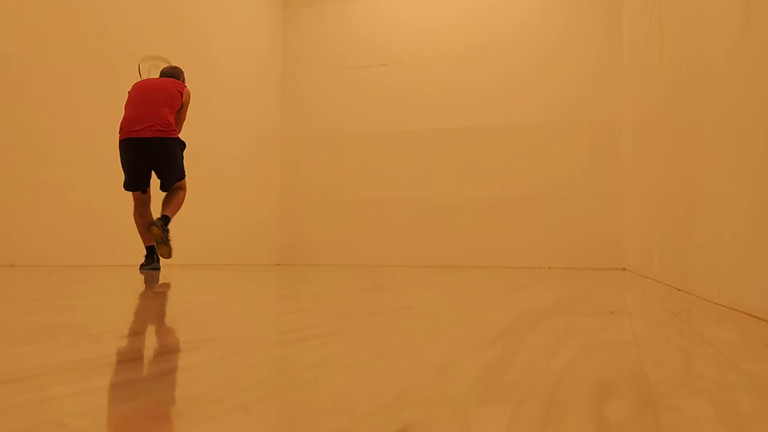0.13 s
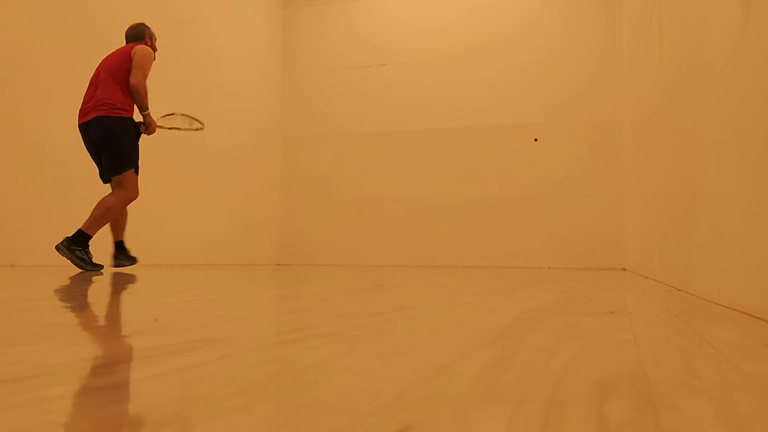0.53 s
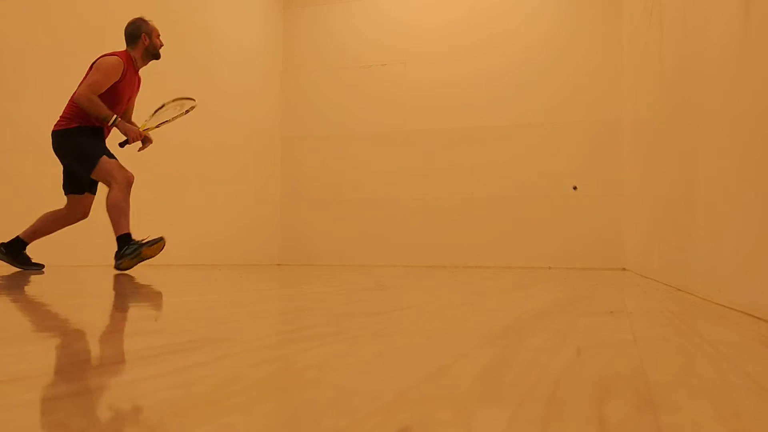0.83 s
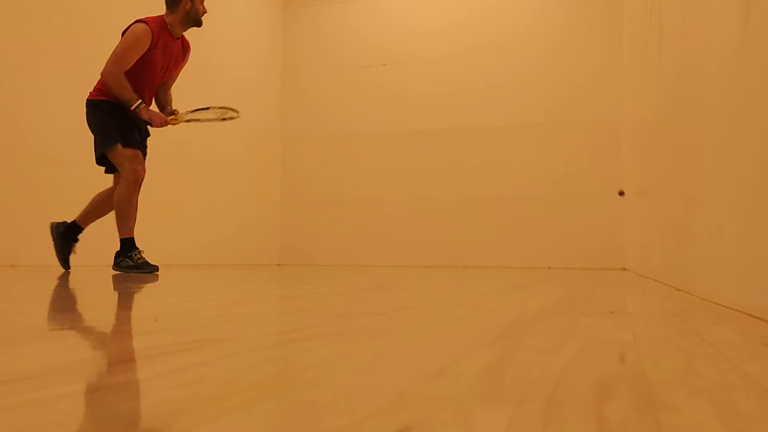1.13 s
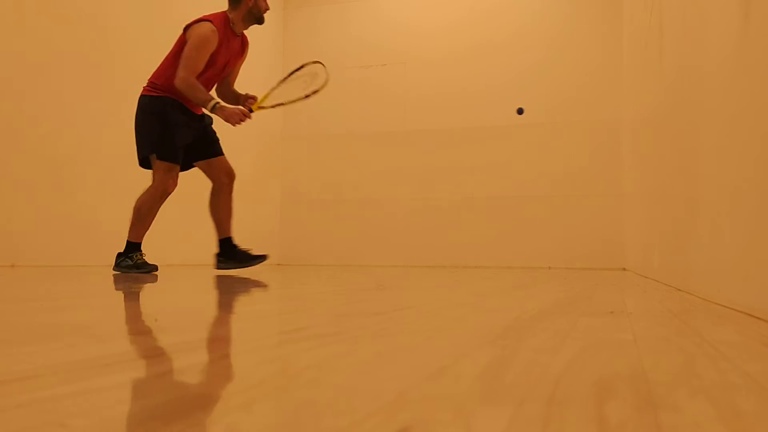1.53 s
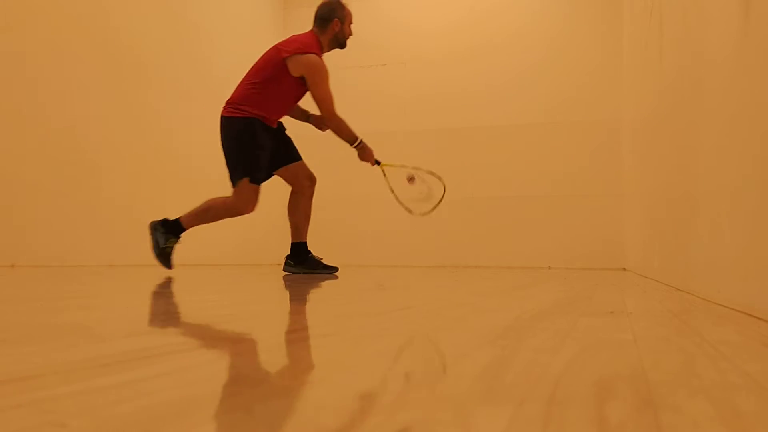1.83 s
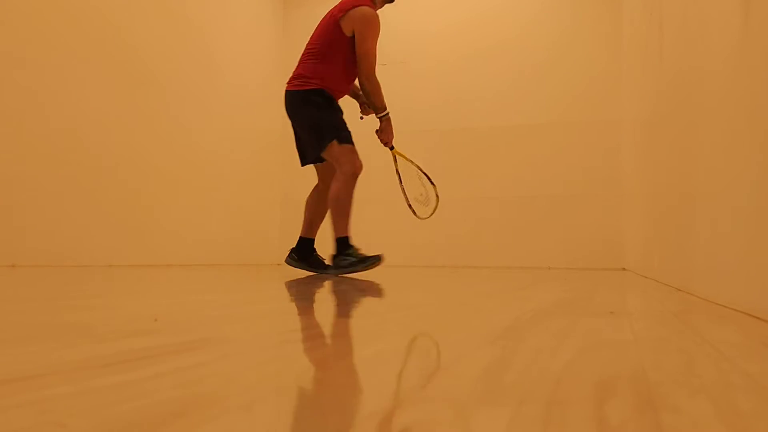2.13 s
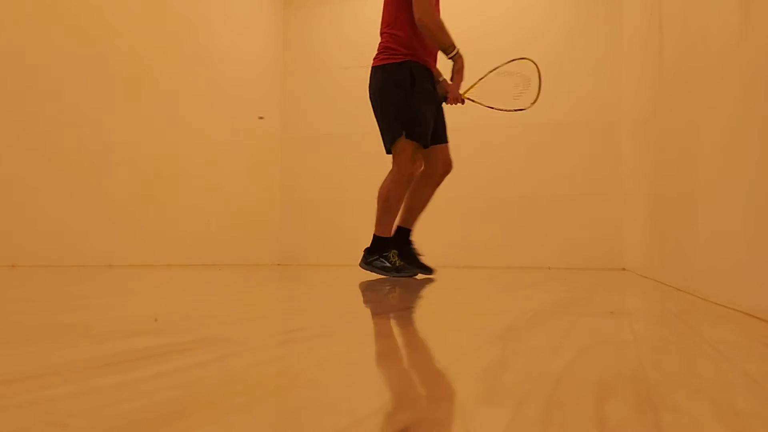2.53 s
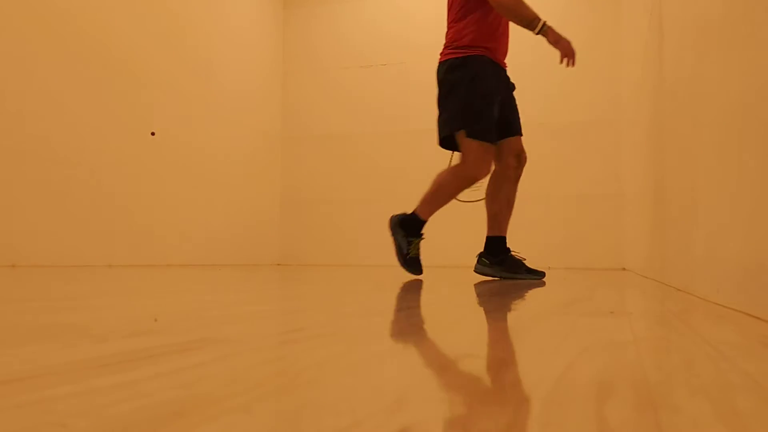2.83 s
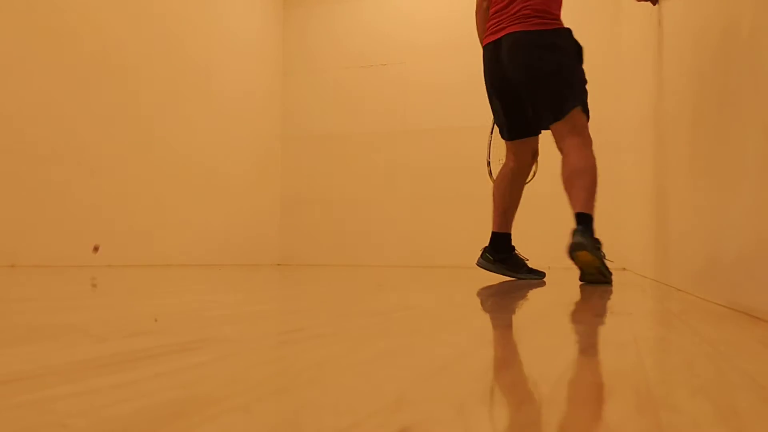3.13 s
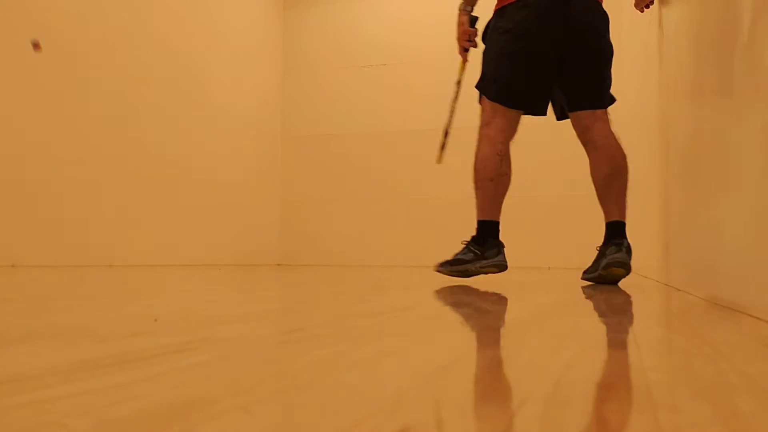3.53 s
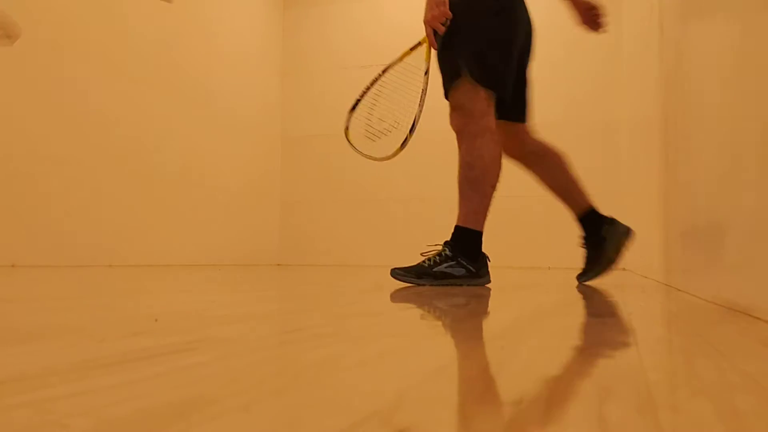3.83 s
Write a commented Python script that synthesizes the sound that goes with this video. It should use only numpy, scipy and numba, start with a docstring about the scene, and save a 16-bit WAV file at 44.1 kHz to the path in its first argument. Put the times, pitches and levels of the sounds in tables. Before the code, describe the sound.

A racquet smacks a rubber ball that cracks off walls and floor in an echoing court

```python
"""In a bare, hard court with steady air noise, the tail of an earlier blow dies away as a little metal jingles.
A racquet then strikes a rubber ball, which bounces off walls and floor while shoes step.
Each arrival or strong wall echo is a noise crack, a ring of decaying modes and a low sine thud; panels hum on.
Shaped noise makes the long tail; two spaced microphones feed a limiter and a soft clipper."""
import sys
import numpy as np
from scipy import signal
from scipy.fft import rfft, irfft, next_fast_len
from scipy.io import wavfile
from scipy.ndimage import uniform_filter1d
from numba import njit

SR = 44100
rng = np.random.default_rng(int(sys.argv[2]) if len(sys.argv) > 2 else 0)


def int16_out(signal):
    """Quantize to a 16-bit WAV file."""
    q = np.round(np.clip(np.atleast_2d(signal).T, -1, 1) * 32767)
    wavfile.write(sys.argv[1], SR, q.astype(np.int16))


def gain_from_db(level_db):
    """Convert decibel levels to linear amplitude factors (20 dB per decade)."""
    decades = np.asarray(level_db, float) / 20
    return 10 ** decades


N = 176400


def curve(table, hz):
    """Interpolate (frequency [Hz], value) points on a log-frequency axis."""
    table = np.array(table, float)
    return np.interp(np.log(hz + 1), np.log(table[:, 0] + 1), table[:, 1])


def colour(x, table):
    """Filter by (frequency [Hz], gain [dB]) points."""
    hz = np.fft.rfftfreq(x.shape[-1], 1 / SR)
    return irfft(rfft(x) * gain_from_db(curve(table, hz)), x.shape[-1])


def decay(t, t60):
    """Exponential decay by 60 dB in t60 seconds."""
    return np.exp(-np.log(1000) * t / t60)


# air spectrum before levelling: (frequency [Hz], relative density [dB per Hz])
AIR_SPECTRUM = [(15, -36), (25, -23), (219, 0), (312, -9.5), (387, -1.5), (582, -3.5), (743, -8.5),
                (1310, -26), (5240, -27.5), (16400, -65)]
AIR_MID_RMS_DB, AIR_SIDE_HIGHPASS_HZ = -39, 900


def air():
    """Steady ventilation rumble and hiss; a high-passed side signal keeps the bass alike left and right."""
    mid, side = colour(rng.standard_normal((2, N)), AIR_SPECTRUM)
    side = signal.lfilter(*signal.butter(1, AIR_SIDE_HIGHPASS_HZ, "high", fs=SR), side)
    return gain_from_db(AIR_MID_RMS_DB) * np.array([mid + side, mid - side]) / mid.std()


# band centres of the blow levels: (frequency [Hz])
BLOW_BANDS_HZ = [45, 110, 270, 580, 950, 2000, 3600, 5800, 11000]
# blows of ball and shoes as they fill the room:
# (time [s], then relative level [dB] in each of BLOW_BANDS_HZ)
ROOM_BLOWS = [(-.35, 5.5, 3, -2.5, -2, -11.5, -11, -6.5, 2, 17),
              (.02, -28, -20, -31, -21, -17, -22.5, -17, -16, -23),
              (0.491, 0, -3.5, -14, -37, -26, -23, -28, -20, -12),
              (.672, 10, 4, -12, 3, 7, 3.5, 5, 5.5, 6.5),
              (.736, -4, -2.5, 2.5, -7.5, 1.5, 1, -3.5, 3.5, -1),
              (1.136, -4, 4, -6.5, -7, -12, -2, -0.5, -5.5, 0.5),
              (1.578, 0, -20, -30, -9, -7.5, -28, -19, -13.5, -11),
              (1.89, -25, -16, -16, -15, -22, -15, -16, -10.5, -7),
              (1.968, -5, -5, -6.5, -14.5, -2.5, -8.5, -3.5, -1.5, -2.5),
              (2.28, -4, -4, -9, -20, -9, -20, -27, -25, -10), (2.5, 10, -2, 1, 4.5, 1.5, 7, -2, 4, 5),
              (2.589, 1, -7, 0, -7.5, -7.5, -1, 5, 4.5, 4),
              (2.85, -4, 0.5, -11.5, 2, -2.5, -3, -2.5, -21, -31),
              (3.296, -9, -12, -12.5, -10, -8, -5.5, -3.5, -7, -1.5),
              (3.81, -15, -28, -1, -3, -7.5, -15, -11, -5, -0.5)]
# hollow notes of ball, wall and floor sent into the room:
# (time [s], frequency [Hz], bandwidth [Hz], relative peak level [dB])
HOLLOW_NOTES = [(.67, 313, 69.6, 6.5), (.67, 410, 88, 2), (.7, 130, 60, 5.5), (.67, 863, 192, 5.5),
                (.74, 690, 80, 4.5), (2.66, 247.6, 50.6, 7), (1.2, 133, 60, -1.5), (2.5, 119, 30, 4),
                (2.52, 239, 45, 10), (2.59, 630, 78, 10), (2.59, 870, 60, 1), (2.85, 126, 40, 4.5),
                (3.296, 115.7, 50.6, 10), (3.81, 231, 80, -6)]
LEAD_S = 0.5  # makes room for the blow before time 0


def blow_spectrum(hz):
    """Blows are coloured impulses; hollow notes are single resonances; both are delayed by phase."""
    total = 0
    for s, *levels_db in ROOM_BLOWS:
        level = gain_from_db(curve(list(zip(BLOW_BANDS_HZ, levels_db)), hz))
        total = total + level * np.exp(-2j * np.pi * hz * (s + LEAD_S))
    for s, note_hz, width_hz, db in HOLLOW_NOTES:
        resonance = gain_from_db(db) / (1 + 2j * (hz - note_hz) / width_hz)
        total = total + resonance * np.exp(-2j * np.pi * hz * (s + LEAD_S))
    return total


# reverberation time: (frequency [Hz], t60 [s])
ROOM_T60 = [(40, 5.2), (120, 1.77), (300, 2.57), (900, 3.87), (2500, 3.23), (5500, 2.35), (9000, 0.7),
            (15000, 0.54)]
# filling of the room: (frequency [Hz], time constant [s])
ROOM_BUILD = [(60, 0.0093), (250, 0.029), (900, 0.012), (5000, 0.011)]
# early-echo clumping before smoothing and fade: (frequency [Hz], level spread [dB])
CLUMP_SPREAD = [(200, 3), (900, 6.5), (5000, 5)]
CLUMP_S, CLUMP_FADE_S = 0.005, 0.15
OWN_CLUMP_WEIGHT = 0.39  # part of the clumping that each octave has for itself


def room_tail():
    """Octave bands of noise build up and decay, with random level clumps that fade into a wash."""
    t = np.arange(N + SR // 2) / SR
    hold = int(CLUMP_S * SR)
    steps = np.repeat(rng.standard_normal((11, 4000)), hold, axis=1)[:, :len(t)]
    steps = uniform_filter1d(steps, hold // 2)
    shared, own = steps[0], steps[1:]
    clumps = (1 - OWN_CLUMP_WEIGHT ** 2) ** 0.5 * shared + OWN_CLUMP_WEIGHT * own
    clumps = clumps * np.exp(-t / CLUMP_FADE_S)
    hz = np.fft.rfftfreq(len(t), 1 / SR)
    noise = rfft(rng.standard_normal((2, len(t))))
    tail = 0
    for centre_hz, clump in zip(30 * 2.0 ** np.arange(10), clumps):
        band = np.clip(1 - np.abs(np.log2((hz + 1) / centre_hz)), 0, 1)
        build = 1 - np.exp(-t / curve(ROOM_BUILD, centre_hz))
        envelope = decay(t, curve(ROOM_T60, centre_hz)) * build
        clumping = gain_from_db(curve(CLUMP_SPREAD, centre_hz) * clump)
        tail = tail + irfft(noise * band, len(t)) * envelope * clumping
    return tail


# tail colour of the mid signal: (frequency [Hz], relative density [dB per Hz])
ROOM_MID = [(25, -6.5), (45, -10.5), (76, -2.5), (140, 0.5), (250, -1), (409, -2.5), (560, -6), (666, -3),
            (750, -4), (870, -1.5), (960, -3.5), (1080, -9), (1230, -15.5), (1970, -17.5), (3000, -19.5),
            (4100, -23.5), (4700, -19.5), (5200, -12), (5600, -18.5), (5950, -21), (6400, -16.5),
            (6950, -17.5), (7500, -28), (8200, -41), (10000, -45), (15500, -55)]
# tail colour of the side signal: (frequency [Hz], relative density [dB per Hz])
ROOM_SIDE = [(25, -54), (111, -47), (377, -12.5), (536, -13), (974, 6.5), (1180, -5), (1720, -17),
             (3000, -16), (4100, -21.5), (4600, -18), (5200, -9.5), (5950, -21.5), (6700, -12.5),
             (7300, -22), (8200, -37.5), (10000, -47), (15500, -49)]
MID_GAIN_DB, SIDE_GAIN_DB = -3.5, -6


def court():
    """Convolve every blow with the room tail, then colour its mid and side signals."""
    size = next_fast_len(2 * N + SR)
    hz = np.fft.rfftfreq(size, 1 / SR)
    mid_db = curve(ROOM_MID, hz) + MID_GAIN_DB
    side_db = curve(ROOM_SIDE, hz) + SIDE_GAIN_DB
    spectrum = rfft(room_tail(), size) * blow_spectrum(hz) * gain_from_db(np.array([mid_db, side_db]))
    start = int(LEAD_S * SR)
    mid, side = irfft(spectrum, size)[:, start:start + N]
    return np.array([mid + side, mid - side])


EAR_LAG_S = 0.0005  # largest delay between microphones


def place(out, sound, s, pan_db):
    """Add a sound at time s; the far microphone hears it weaker and later; positive pan is left."""
    out = out.copy()
    for ch, sign in enumerate((1, -1)):
        lag_s = EAR_LAG_S * np.clip(0.5 - sign * pan_db / 4, 0, 1)
        i = int((s + lag_s) * SR)
        part = sound[:N - i]
        out[ch, i:i + len(part)] += part * gain_from_db(sign * pan_db / 2)
    return out


def ring(modes, t, phases):
    """Sum of exponentially decaying sine modes."""
    total = 0
    for (hz, db, t60), phase in zip(modes, phases):
        total = total + gain_from_db(db) * np.sin(2 * np.pi * hz * t + phase) * decay(t, t60)
    return total


# metal modes: (frequency [Hz], relative level [dB], t60 [s])
METAL_MODES = [(8620, -24, 0.87), (9370, -24, 0.52), (11200, -27, 0.54), (11600, -32, 0.58),
               (12700, -21, 0.51), (13800, -24, 0.61), (15700, -23, 0.36)]
# jingles: (time [s], relative level [dB])
JINGLE_TIMES = [(0.019, -29), (0.502, -48)]
SWING_DB, SWING_HZ = 5.5, 17.1


def jingle():
    """A small piece of metal rings in high modes, each wavering in level as it swings."""
    t, out = np.arange(SR // 2) / SR, np.zeros((2, N))
    for s, db in JINGLE_TIMES:
        for mode in METAL_MODES:
            ring_phase, swing_phase = 6 * rng.random(2)
            waver = gain_from_db(SWING_DB * np.sin(2 * np.pi * SWING_HZ * t + swing_phase))
            out = place(out, gain_from_db(db) * waver * ring([mode], t, [ring_phase]), s, pan_db=1.3)
    return out


# crack colour without its peak: (frequency [Hz], relative gain [dB])
CRACK_COLOUR = [(500, -23), (1200, -12), (2500, -9), (4000, -8), (5200, -5), (6000, -11.5), (6900, -6),
                (8000, -29), (11000, -32), (16000, -43)]
CRACK_RISE_S, CRACK_DECAY_S, CRACK_GAIN_DB = 0.00043, 0.0032, 10
CRACK_PEAK_DB, CRACK_PEAK_OCTAVES = 9.5, 0.48
CLICK_DB, CRACK_PAD_S = 12, 0.002  # first sharp contact; pad ahead of the burst


def crack(t, peak_hz, db):
    """Short noise burst with a click near its onset, coloured with one spectral peak."""
    hz = np.fft.rfftfreq(len(t), 1 / SR) + 1
    after = np.maximum(t - CRACK_PAD_S, 0)
    envelope = (1 - np.exp(-after / CRACK_RISE_S)) * np.exp(-after / CRACK_DECAY_S)
    burst = rng.standard_normal(len(t)) * envelope
    burst[int(CRACK_PAD_S * SR) + 20] += gain_from_db(CLICK_DB)
    peak_db = CRACK_PEAK_DB * np.exp(-(np.log2(hz / peak_hz) / CRACK_PEAK_OCTAVES) ** 2)
    return irfft(rfft(burst) * gain_from_db(curve(CRACK_COLOUR, hz) + peak_db + db + CRACK_GAIN_DB), len(t))


# ball modes before pitch scatter: (nominal frequency [Hz], relative level [dB], t60 [s])
BALL_MODES = [(570, -4.5, 0.028), (723, -1, 0.035), (880, -0.5, 0.042), (1050, 4.5, 0.038),
              (1250, -1.5, 0.027), (1485, 1, 0.013)]
BALL_SCATTER, BALL_RISE_S = 0.068, 0.0013  # scatter: largest fractional pitch shift


def ball_ring(t, db):
    """Hollow ball modes, their pitches scattered anew each time."""
    shifts, turns = rng.random((2, len(BALL_MODES)))
    modes = []
    for (hz, mode_db, t60), shift in zip(BALL_MODES, shifts):
        modes.append((hz * (1 + BALL_SCATTER * (2 * shift - 1)), mode_db, t60))
    return gain_from_db(db) * ring(modes, t, 2 * np.pi * turns) * (1 - np.exp(-t / BALL_RISE_S))


THUD_CYCLES, THUD_GAIN_DB = 1.7, 1


def thud(t, hz, db):
    """Low sine under a half-sine envelope a few half-cycles long."""
    cycles = t * hz
    envelope = np.sin(np.pi * np.clip(cycles / THUD_CYCLES, 0, 1))
    return gain_from_db(db + THUD_GAIN_DB) * np.sin(2 * np.pi * cycles) * envelope


# first arrivals and strong wall echoes:
# (time [s], relative crack level [dB], crack peak [Hz], relative ring level [dB],
#  relative thud level [dB], thud frequency [Hz], left-right of crack and ring [dB])
ARRIVAL_EVENTS = [(0.665, -16, 5540, -9.5, -29, 257, -1), (0.675, -15, 6660, -5, -8.5, 245, -1.5),
                  (0.682, -14, 6460, -14, -21, 328, -1.5), (0.693, -19, 6000, -21, -9.5, 244, -2.5),
                  (0.7228, -24, 5500, -32, -25, 248, -3), (0.735, -22, 6800, -46, -10, 259, -14),
                  (0.743, -17, 5200, -24, -16, 297, -3), (1.1347, -16.5, 3500, -41, -25, 132, 1),
                  (1.156, -23, 4500, -22, -17.5, 194, 0.5), (1.196, -24, 5200, -37, -25, 200, 0.5),
                  (1.209, -40, 5186, -24, -15, 186, -2.5), (1.549, -31.5, 9000, -28, -36, 200, 0.5),
                  (1.5776, -28.5, 8950, -41, -38, 200, 0.5), (1.948, -20, 2490, -13.5, -17, 198, 6),
                  (1.9714, -18, 6400, -29, -29, 200, 8), (2.007, -24.5, 6400, -27, -29, 200, 12),
                  (2.435, -35, 2520, -20, -28, 176, 1), (2.494, -10, 1800, -6.5, -29, 248, 1),
                  (2.5024, -3, 3670, -8.5, -10.5, 239, -1), (2.529, -14.5, 6500, -36, -12.5, 200, 1),
                  (2.54, -56, 6000, -32, -15.5, 241, -3), (2.563, -38, 6000, -35, -11, 238, -8),
                  (2.575, -20, 6500, -26, -16, 236, -13), (2.588, -9, 5100, -31, -8, 236, -1),
                  (2.597, -14.5, 2800, -29, -21, 240, 1), (2.673, -17, 5130, -29, -28, 230, -4),
                  (2.68, -22, 5500, -26, -25, 232, -2.5), (3.294, -19.5, 6900, -23, -8.5, 124, 10.5),
                  (3.301, -21, 6500, -34, -27, 125, 4), (3.317, -18, 6000, -27, -13, 120.9, -2.5),
                  (3.327, -31, 6070, -30, -34, 121, 1), (3.339, -36, 5550, -37, -10.5, 111, -2),
                  (3.378, -36, 5500, -28, -11, 112, 8), (3.810, -24, 6630, -28, -12, 214, 9),
                  (3.825, -27, 6600, -32, -13, 243, -1)]


def arrivals():
    """Each arrival adds panned crack and ball ring and a centred thud."""
    t, out = np.arange(SR // 8) / SR, np.zeros((2, N))
    for s, crack_db, crack_hz, ring_db, thud_db, thud_hz, pan_db in ARRIVAL_EVENTS:
        out = place(out, crack(t, crack_hz, crack_db), s - CRACK_PAD_S, pan_db)
        out = place(out, ball_ring(t, ring_db), s, pan_db)
        out = place(out, thud(t, thud_hz, thud_db), s, 0)
    return out


# wall panels and floorboards humming on after hard blows, before wobble:
# (time [s], length [s], start frequency [Hz], end frequency [Hz], nominal level [dB])
PANEL_HUMS = [(0.677, 0.019, 980, 904, -15), (2.508, 0.014, 880, 860, -13), (2.535, 0.1, 232.2, 294, -15),
              (2.641, .11, 222.6, 263, -15), (2.771, 0.043, 644, 668, -16), (2.85, 0.079, 190, 125, -20.5)]
PANEL_WOBBLE, PANEL_WOBBLE_DB = 0.031, 1.5  # fractional pitch and level, per unit of random drift


def panels():
    """Each panel swells and fades on a sliding, unsteady sine."""
    out = np.zeros((2, N))
    for s, length_s, start_hz, end_hz, db in PANEL_HUMS:
        u = np.arange(int(length_s * SR)) / (length_s * SR)
        wobble = np.interp(u, np.linspace(0, 1, 8), rng.standard_normal(8))
        hz = (start_hz + (end_hz - start_hz) * u) * (1 + PANEL_WOBBLE * wobble)
        level = gain_from_db(db + PANEL_WOBBLE_DB * wobble[::-1]) * np.sqrt(np.sin(np.pi * u))
        out = place(out, level * np.sin(2 * np.pi * np.cumsum(hz) / SR), s, 0)
    return out


def scene():
    """Sum of air, room tail, metal, arrivals and humming panels."""
    return air() + court() + jingle() + arrivals() + panels()


@njit
def follow(x, attack, release):
    """One-pole envelope with quick rise and slow fall; rates per sample."""
    e, out = 1e-3, np.empty(len(x))
    for i in range(len(x)):
        e += (x[i] - e) * (attack if x[i] > e else release)
        out[i] = e
    return out


def band_limit(x):
    """A steep low-pass at the top of the band."""
    return signal.sosfilt(signal.butter(12, 16520, fs=SR, output="sos"), x)


# microphone colour difference: (frequency [Hz], left-right [dB])
MIC_DIFFERENCE = [(100, 0), (200, -1), (380, 4), (700, 4), (1290, 2), (2380, 0.5), (4400, -7), (6000, 0),
                  (8120, 16), (15000, -7)]
LIMIT_DB, RATIO, ATTACK_S, RELEASE_S, SOFT_TOP = -12, 1.29, 0.00054, 0.14, 0.66


def record(dry):
    """Colour the two microphones apart, limit both by one shared envelope and round the peaks."""
    tilt = gain_from_db(curve(MIC_DIFFERENCE, np.fft.rfftfreq(N, 1 / SR)) / 2)
    x = irfft(rfft(dry) * np.array([tilt, 1 / tilt]), N)
    env = follow(np.abs(x).max(axis=0), 1 / (ATTACK_S * SR), 1 / (RELEASE_S * SR))
    limited = x * np.minimum(1, gain_from_db(LIMIT_DB) / env) ** (1 - 1 / RATIO)
    mix = SOFT_TOP * np.tanh(limited / SOFT_TOP)
    return band_limit(mix)


dry = scene()
out = record(dry)
int16_out(out)
```